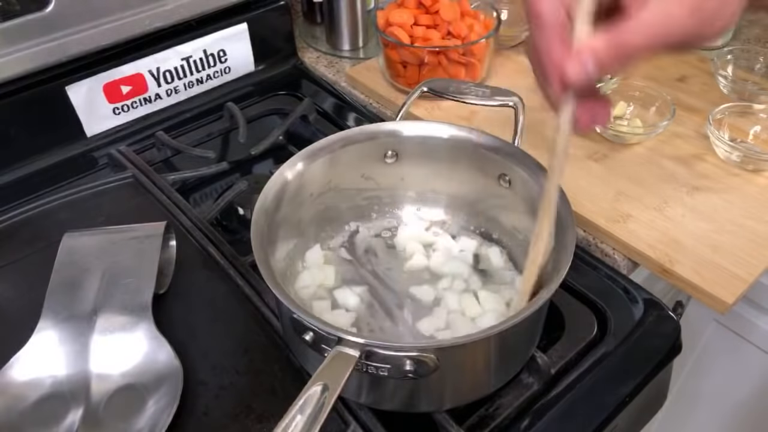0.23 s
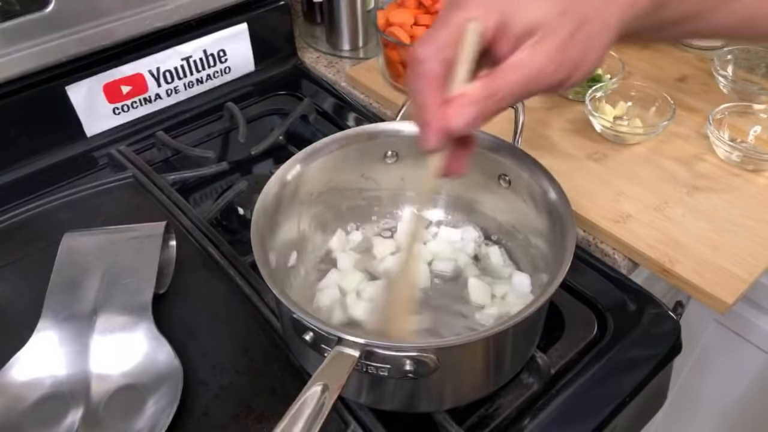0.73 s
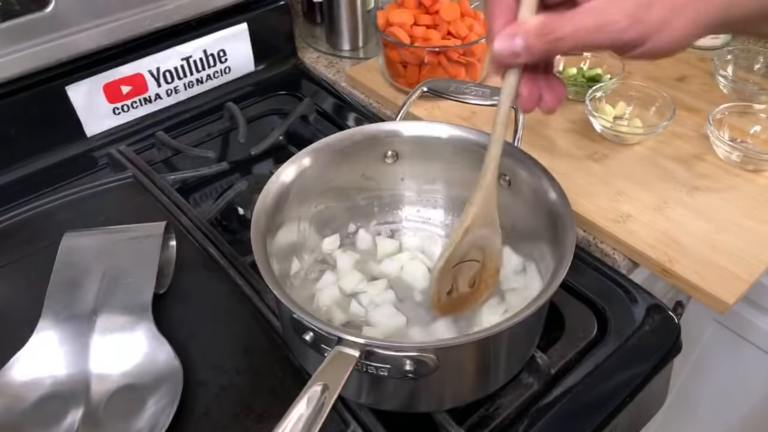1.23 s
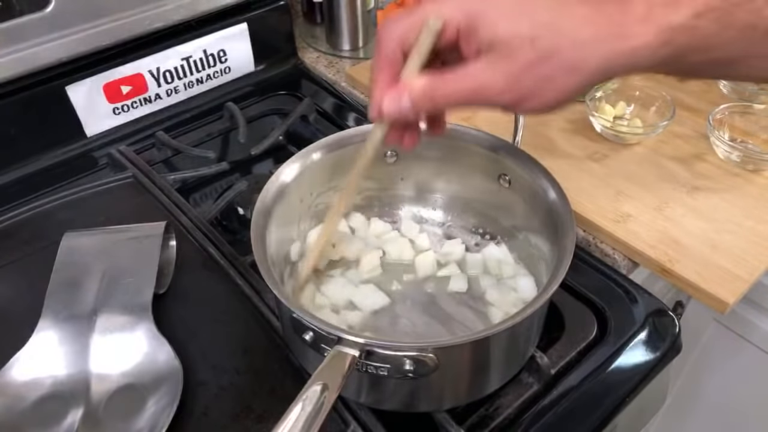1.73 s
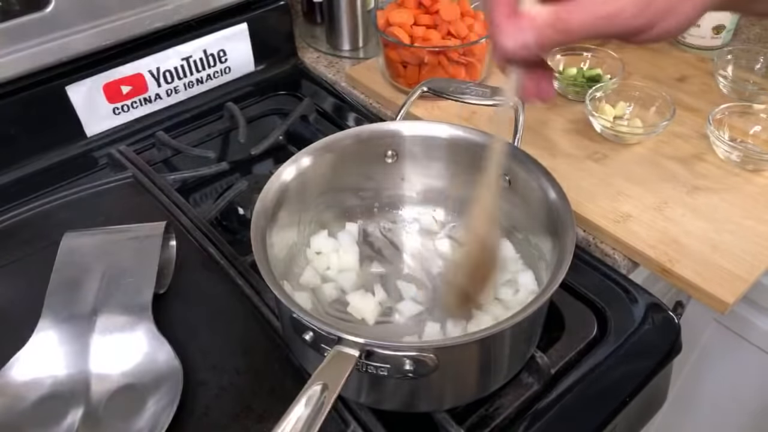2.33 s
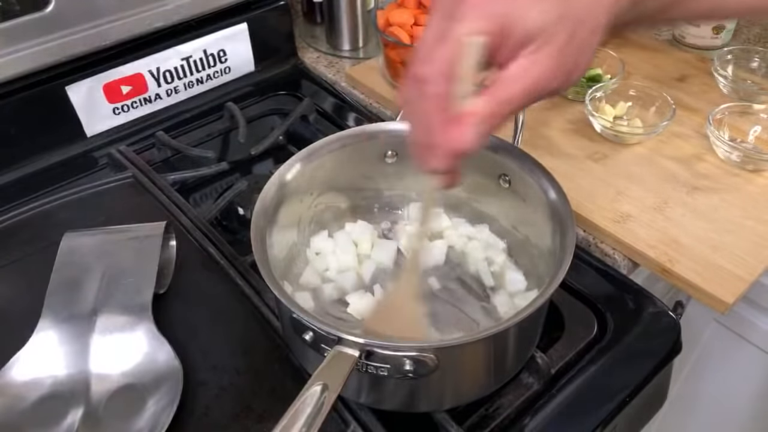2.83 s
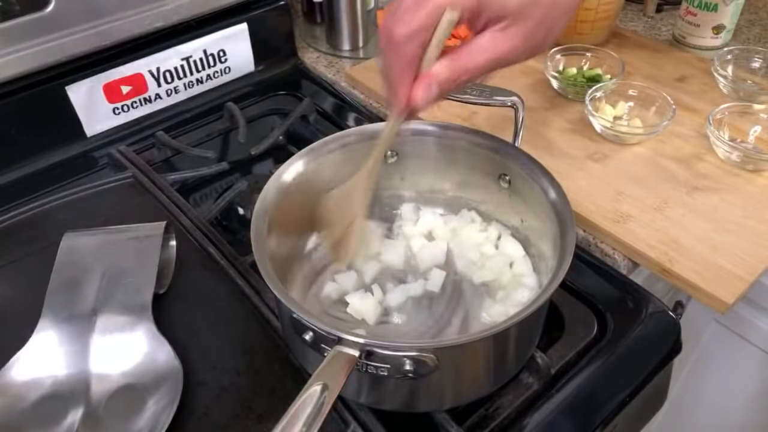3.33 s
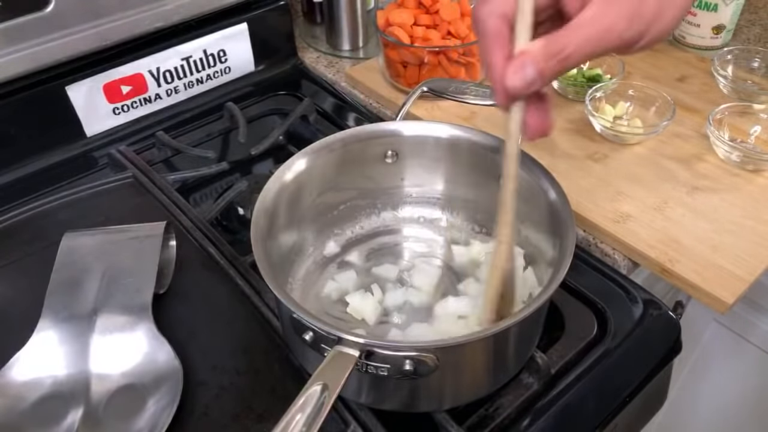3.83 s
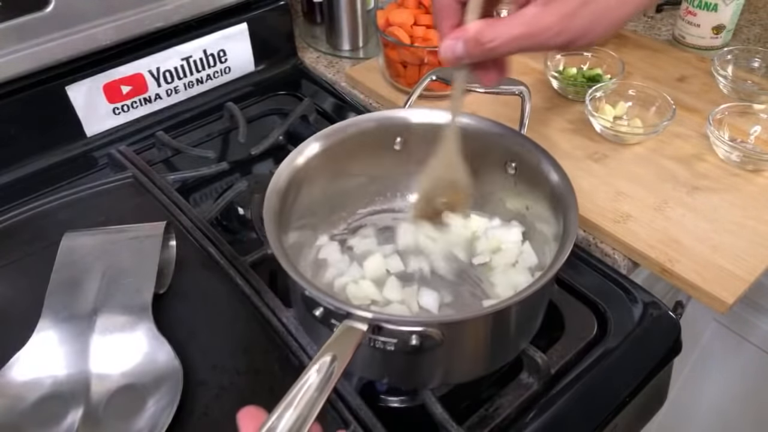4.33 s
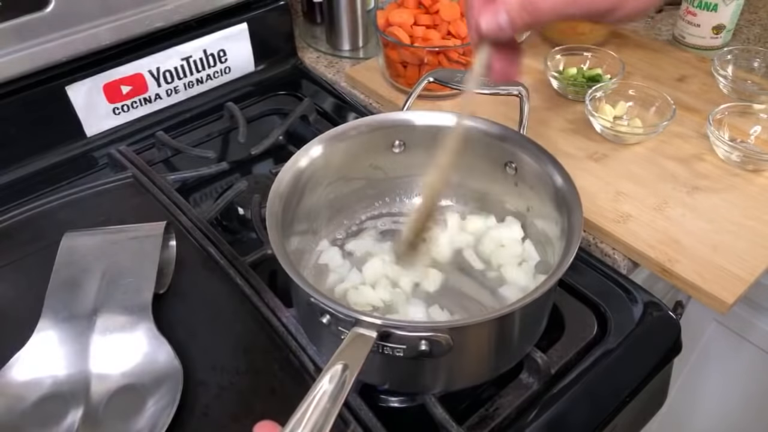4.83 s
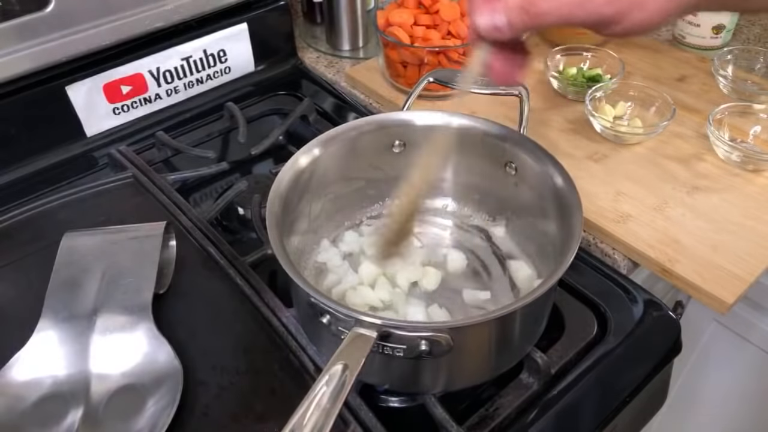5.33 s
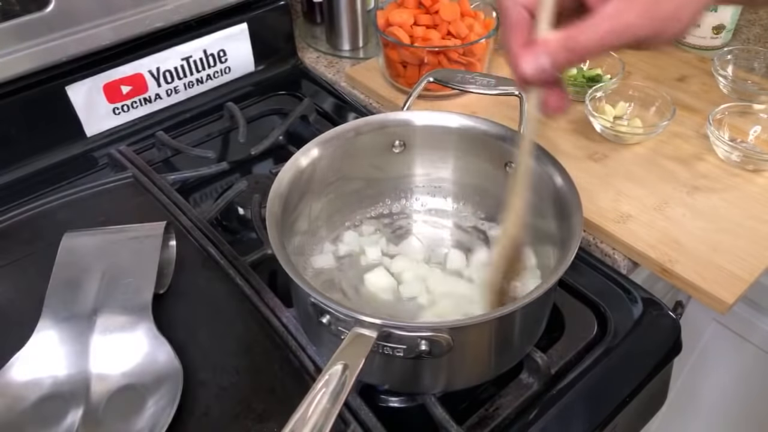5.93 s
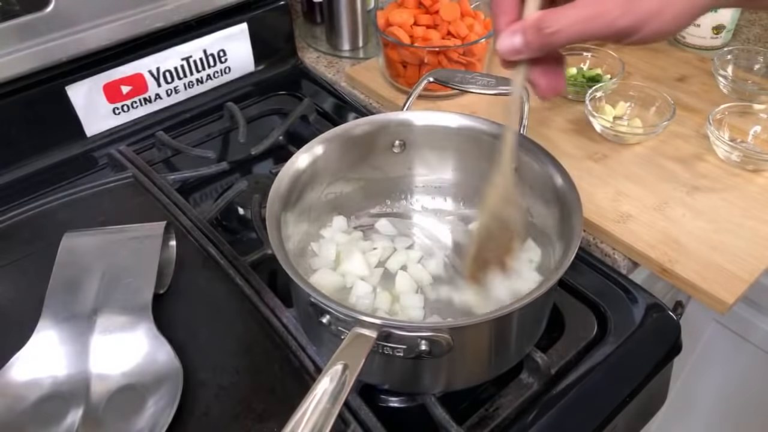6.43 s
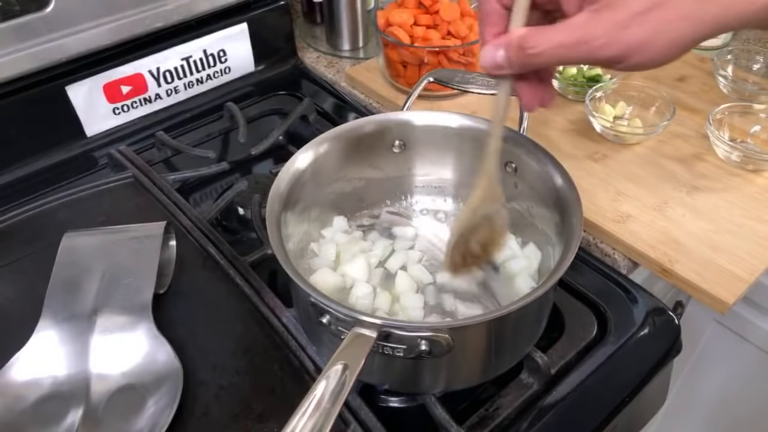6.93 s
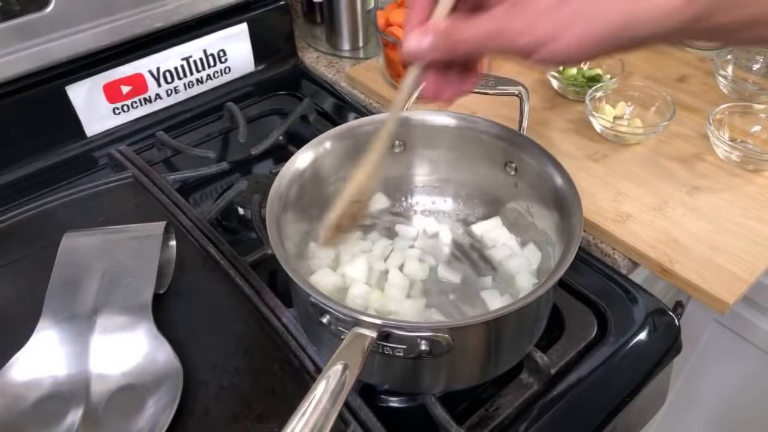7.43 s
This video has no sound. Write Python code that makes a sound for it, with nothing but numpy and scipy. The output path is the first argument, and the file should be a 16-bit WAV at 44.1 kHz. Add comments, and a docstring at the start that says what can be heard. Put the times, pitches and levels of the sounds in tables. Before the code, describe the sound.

Someone stirs chopped onion in a metal pan, woody taps and short drags ringing the steel above soft sizzling, the sound dropping out once late.

```python
"""In a hard-walled kitchen a wooden spoon stirs chopped onion in a steel saucepan on a gas stove.
Blows are filtered impulses with a stick-slip drag of noise; they excite the pan's damped modes, and the pan
also rocks on its grate. Shaped noise makes the sizzle, the rumble, the spitting oil and the kitchen hum.
Sparse decaying echoes form the room. The level dips briefly once, and later fades to silence and returns."""
import sys
import numpy as np
from scipy import signal
from scipy.io import wavfile
from scipy.ndimage import uniform_filter1d

SR = 44100
rng = np.random.default_rng(int(sys.argv[2]) if len(sys.argv) > 2 else 0)


def to_wav(sig):
    """Store sig (one row per channel, or 1-D mono) as 16-bit WAV at the path in sys.argv[1].

    Samples outside -1..1 are clipped; the rate is SR.
    """
    pcm = np.clip(np.atleast_2d(sig), -1, 1) * 32767
    pcm = np.round(pcm).astype(np.int16)
    wavfile.write(sys.argv[1], SR, pcm.T)  # frames by channels


N = 338688

# Spoon blows. Each row: start in seconds, level in dB, contact time in ms, tick in dB, thud in dB,
# ring in dB over the usual, 60 dB decay time of the drag in seconds, and spot (no unit, held within -1 to 2):
# -1, 0 and 1 are three places round the wall, 2 is the base.
BLOWS = [(0.001, -42, 0.76, -15, -8, 9.5, 0.038, -0.9), (0.214, -19, 0.087, -3, -10.5, 5, 0.14, -0.93),
         (0.342, -43, 0.58, -12.5, -3, 6.5, 0.96, 2.3), (0.583, -32, 0.23, -20, 3, -3.5, 0.11, -3),
         (0.981, -19, 0.11, 14, -4, 2, 0.24, -1.05), (1.016, -24.5, 0.33, -26, 1.5, -10, 0.16, 2),
         (1.37, -21, .15, -4.5, -13.5, 1, 0.17, 0.54), (1.503, -27.5, 0.17, 2.5, 9, 0.5, 0.17, 8),
         (1.516, -22, 0.63, -29, -11.5, -8.5, 0.19, -2.5), (1.769, -44.5, 0.82, -11, -8, -5.5, 0.07, 4),
         (2.054, -36, 0.21, -23, 4, -2, 0.21, -1), (2.108, -40, 0.56, -19, 0, -4.5, 0.19, 1.9),
         (2.397, -24.5, 0.14, -15, -6.5, 2, 0.17, 0.18), (2.654, -38, 0.16, -9, -26, -4.5, 0.06, 2.3),
         (2.723, -34.5, 0.29, -20, 4.5, -3.5, 0.26, 2.4), (2.956, -51, 0.96, -8, -5, 2.5, 0.055, 4),
         (3.207, -33, 0.34, -24, 0.5, -4, 0.26, 1.5), (3.857, -43, 0.72, -25, -11.5, -2, 0.38, 0.5),
         (3.922, -38.5, 0.78, -36, -5, -4.5, 0.16, 2.3), (4.128, -31.5, 0.31, -28, -8.5, 1.5, 0.23, 1),
         (4.164, -25, 0.48, -23.5, 1, -3.5, 0.6, 0.7), (4.628, -37, 0.28, -11.5, 4.5, 4, 0.39, -0.7),
         (4.959, -34.5, 0.36, -19, 2, 1, 0.52, -0.7), (5.001, -26, 0.47, -24, -5, -4.5, 0.15, 1.4),
         (5.741, -27, 0.82, -47, -22, -3.5, 0.07, 1.5), (5.949, -24, 0.2, -5.5, -14, 5, 0.25, 0.86),
         (6.053, -21.5, 0.38, -19.5, -6.5, -7, 0.15, 2.12),
         (6.322, -30.5, 0.32, -24, -8.5, -1.5, 0.17, 0.7), (6.414, -31.5, 0.62, -25, -5, -10.5, 0.14, 1),
         (6.845, -22, 0.23, -2.5, -6, -6, 0.11, -1.2), (6.87, -24, 0.43, -24, -10, 0, 0.13, 1.34),
         (7.272, -21.5, 0.37, -23, -4, -6, 0.051, 1.96), (7.541, -29, 0.54, -29, -10, -1.5, 0.18, 1.2)]
# Pan modes, the low ones damped by oil, onion and grate. Each row: frequency in Hz,
# level in dB when struck at spot -1, 0, 1 and 2, and 60 dB decay time in seconds.
PAN_MODES = [(170.7, -5.5, -6, -4.5, 4, 0.21), (351.6, 2.5, 2, 10, 4, 0.032),
             (649, -6.5, -10, -20.5, -8, 0.14), (804, -10, -16, -14, 1, 0.14),
             (856.5, -5, -4, -3, -3, 0.14), (916.4, -8.5, -10, -8, 3.5, 0.11),
             (1273, -4, -6, -26, -3.5, 0.061), (1506, -12, -20, -12, -1, 0.13),
             (1768, -22, -22, -26, 2, 0.14), (1930, -6, -12, -10, 2.5, 0.12), (2275, -3, -3, -14, 6, 0.08),
             (2489, -9, 3, -18, -24, .6), (2835, -16, -20, -3, -28, .36), (3289, -22, -30, -20, -30, 1.4),
             (3368, -10, -26, -22, -28, .3), (3471, -17, -14, -3, -28, .36), (3576, -14, -15, -6, -26, .7),
             (4123, -18, -13, -7, -30, .5), (4507, 0, -20, -16, -24, .33), (4948, -13, -22, -18, -24, .25),
             (5625, -19, -24, -20, -13, .24), (6186, -14, -22, -16, -20, .14),
             (6568, -11, -24, -22, -26, .28)]
RING_DB = -30  # base level of the pan modes, before the adjustments for each source


def gain_of(db):
    """Level definition: amplitude is ten to the power dB / 20."""
    return 10 ** (np.asarray(db) / 20)


def decay(t, t60):
    """Exponential damping: the level falls 60 dB in each t60 seconds."""
    return gain_of(-60 * t / t60)


def unit_rms(x):
    """Mean-square normalization: scales a signal to rms 1."""
    return x / np.sqrt(np.mean(x ** 2) + 1e-20)


def interpolate(points, hz):
    """Logarithmic pitch scale: reads a (Hz, value) table along log frequency."""
    f, value = np.transpose(points)
    return np.interp(np.log(hz + 1), np.log(f + 1), value)


def add(mix, start_s, sound):
    """Superposition: adds a sound to the mix at its starting time."""
    part = mix[round(start_s * SR):][:len(sound)]
    part += sound[:len(part)]


def minimum_phase(points, size=1024):
    """Minimum phase: a (Hz, dB) table fixes a causal filter through the Hilbert transform; energy is 1."""
    hz = abs(np.fft.fftfreq(size, 1 / SR))
    log_gain = np.log(gain_of(interpolate(points, hz)))
    spectrum = np.exp(np.conj(signal.hilbert(log_gain)))
    taps = np.fft.ifft(spectrum).real[:size // 2]
    return taps / np.linalg.norm(taps)


def patchy_noise(points, patchy_db, size):
    """Random noise with a shaped spectrum whose level wanders in time and frequency; rms 1."""
    hz = np.fft.rfftfreq(size, 1 / SR)
    real, imaginary, patches = rng.standard_normal((4 * N // size + 5, len(hz), 3)).T
    patches = uniform_filter1d(patches, size=9, axis=0)
    patches = unit_rms(uniform_filter1d(patches, size=9, axis=1))
    level_db = interpolate(points, hz)[:, None] + patchy_db * patches
    z = (real + 1j * imaginary) * gain_of(level_db)
    noise = signal.istft(z, nperseg=size, noverlap=3 * size // 4)[1]
    return unit_rms(noise[:N])


def stove():
    """Random sources add: sizzle of hiss and tiny crackles, low rumble, and the steady kitchen hum."""
    # Each row: time in seconds, sizzle level in dB, level in dB of the low rumble of hand, handle and grate.
    levels = [(0, -68.5, -70.5), (1.3, -68, -72.5), (1.6, -66, -55.5), (2.0, -67, -72.5), (3.2, -65, -72),
              (3.4, -61.5, -64), (3.8, -68.5, -69.5), (4.15, -68.5, -70), (4.32, -60, -58), (4.5, -67, -68),
              (5.1, -65.5, -73.5), (5.901, -69.5, -66), (6.5, -65.5, -66), (7.0, -63.5, -76),
              (7.68, -64.5, -64.5)]
    # Spectra of sizzle, rumble and hum. Each row: frequency in Hz, relative level in dB per Hz.
    sizzle_spectrum = [(2350, -34.5), (4000, -3), (5330, -4.5), (6990, -5.5), (8300, 3.5), (9470, 6),
                       (12800, -0.5), (15800, -8.5)]
    rumble_spectrum = [(22, -34), (36, -16.5), (46, 3.5), (92, -0.5), (165, -1), (210, -13), (320, -23.5)]
    hum_spectrum = [(88, -14), (150, -2.5), (363, -3.5), (565, -10), (644, -6.5), (879, -7.5),
                    (1460, -12.5), (1930, -11.5), (7500, -22.5), (9750, -32), (16500, -120)]
    time_s, sizzle_db, rumble_db = np.transpose(levels)
    t = np.arange(N) / SR
    sizes = gain_of(4.4 * np.minimum(rng.exponential(1, N), 5))
    happens = rng.random(N) < 1500 / SR  # on average 1500 crackles a second
    crackle = sizes * happens * rng.choice([-1, 1], N)
    crackle = unit_rms(signal.oaconvolve(crackle, minimum_phase(sizzle_spectrum))[:N])
    sizzle = unit_rms(patchy_noise(sizzle_spectrum, 1.8, size=256) + 0.25 * crackle)
    rumble = patchy_noise(rumble_spectrum, 5.1, size=2048)
    hum = gain_of(-69) * patchy_noise(hum_spectrum, 3.2, size=1024)
    sizzle = gain_of(np.interp(t, time_s, sizzle_db)) * sizzle
    rumble = gain_of(np.interp(t, time_s, rumble_db)) * rumble
    return sizzle + rumble + hum


def blow_colour(contact_ms, tick_db, thud_db):
    """Contact time sets bandwidth: short reaches high, long is dull; a tick lies on top, a thud below."""
    # Each entry: frequency in Hz of a band in the spectrum of a blow.
    band_hz = (280, 850, 2200, 4500, 8500)
    hz = np.array(band_hz)
    # the push fades at 26 dB per octave above 1 / contact time; the tick rises at 4.5 dB per octave
    octaves_above = np.log2(hz * max(contact_ms, .02) / 1000)
    push_power = 1 / (1 + gain_of(2 * 26 * octaves_above))
    tick_power = gain_of(2 * (tick_db + 4.5 * np.log2(hz / hz[-1])))
    db = 10 * np.log10(push_power + tick_power)
    db = db + thud_db * (hz == hz[0])
    return [(60, db[0] - 18), *zip(hz, db), (16000, db[-1] - 24)]


def pan_modes(length):
    """Modal vibration: gives each mode's gain at the four spots, and its damped sine."""
    hz, *spot_db, t60 = np.transpose(PAN_MODES)
    t = np.arange(length) / SR
    rings = np.sin(2 * np.pi * hz[:, None] * t) * decay(t, t60[:, None])
    return gain_of(spot_db), rings


def spoon():
    """Impulse and stick-slip friction: each blow and its dying drag is heard directly and excites the modes."""
    travel_s = 0.0022  # from the pan to the microphone
    bounce_s = .06  # a touch this soon after a blow leaves its ring undamped
    out, ringing = np.zeros(N), np.zeros(N)
    spot_gains, rings = pan_modes(SR)
    t = np.arange(SR // 2) / SR
    # countless small, quickly damped modes smear each blow into a clatter
    clatter = rng.standard_normal((len(BLOWS), SR // 20)) * decay(t[:SR // 20], 0.024)
    clatter /= np.linalg.norm(clatter, axis=1, keepdims=True)
    mode_luck_db = rng.standard_normal((len(BLOWS), len(PAN_MODES)))
    friction = rng.standard_normal((len(BLOWS), len(t), 2))
    landings = np.sort([row[0] for row in BLOWS] + [2 * N / SR])  # the last lies past the end
    for blow, luck_db, slips, smear in zip(BLOWS, mode_luck_db, friction, clatter):
        start_s, db, contact_ms, tick_db, thud_db, ring_db, drag_t60, spot = blow
        uneven = unit_rms(uniform_filter1d(slips[:, 1], size=90))  # stick and slip in 2 ms clumps
        drag = gain_of(-21.0 + 3.1 * uneven) * decay(t, max(drag_t60, .01)) * slips[:, 0]
        # the slips are too small and scattered to ring the pan as the blow does
        heard, driving = drag, gain_of(-20) * drag.copy()
        heard[0] += 1
        # the blow's impulse joins the weakened drag at its first sample, and both drive the pan together
        driving[0] += 1 + gain_of(-20) * 0
        taps = minimum_phase(blow_colour(contact_ms, tick_db, thud_db))
        heard, driving = gain_of(db) * signal.oaconvolve([heard, driving], taps[None], axes=1)
        # a blow between two spots mixes their mode gains
        weights = np.clip(1 - abs(np.clip(spot, -1, 2) - np.arange(-1, 3)), 0, 1)
        mode_gains = weights @ spot_gains * gain_of(luck_db + RING_DB + ring_db + 3.5)
        ring = signal.fftconvolve(driving, mode_gains @ rings)
        # the next touch of the spoon damps the ringing by 9 dB within 20 ms; a quick bounce does not
        next_touch_s = landings[landings > start_s + bounce_s][0] - start_s
        after = np.arange(len(ring)) / SR - next_touch_s
        ring = ring * gain_of(-9 * np.clip(50 * after, 0, 1))
        add(out, start_s + travel_s, gain_of(-10.5) * heard)
        add(out, start_s + travel_s, gain_of(3.5) * signal.oaconvolve(heard, smear))
        add(ringing, start_s + travel_s, ring)
    return out, ringing


def kitchen(x):
    """Reverberation: sparse echoes of random sign, each band dying at its own speed; two tails take turns."""
    # Absorption of the room. Each row: frequency in Hz, 60 dB decay time in seconds.
    band_t60 = [(150, 1), (700, 0.36), (2500, 0.49), (7000, 0.34), (14000, 0.22)]
    taps = np.zeros((2, SR))
    # one echo at a random place in every 20 samples
    at = np.arange(140, SR - 20, 20) + rng.integers(0, 20, (2, (SR - 141) // 20))
    np.put_along_axis(taps, at, rng.choice([-1., 1.], at.shape), 1)
    hz, t, z = signal.stft(taps, SR, nperseg=256)
    z = z * decay(t, interpolate(band_t60, hz)[:, None])
    tails = signal.istft(z, SR, nperseg=256)[1]
    turn = 2 * np.pi * 0.9 * np.arange(N) / SR  # 0.9 turns a second
    fed = x * np.array([np.cos(turn), np.sin(turn)])
    echoes = signal.fftconvolve(fed, tails / np.linalg.norm(tails[0]), axes=1)
    return echoes[:, :N].sum(0)


def rocking():
    """Repeated impact: a blow on the wall sets the pan tapping its grate, dull dying touches that ring the base."""
    interval_s, rock_db, rock_t60 = .036, -10.5, 0.41
    taps = np.zeros(N)
    luck = rng.standard_normal((len(BLOWS), 2, 8))  # eight touches a blow
    for (start_s, db, *_, spot), (late, loud) in zip(BLOWS, luck):
        after = interval_s * np.cumsum(np.clip(1 + .25 * late, .3, 2))
        on_wall = np.clip(2 - spot, 0, 1)  # a blow on the base rocks nothing
        sizes = on_wall * gain_of(db + rock_db + 4.0 * np.clip(loud, -2, 1)) * decay(after, rock_t60)
        for wait, size in zip(after, sizes):
            add(taps, start_s + wait, np.array([size]))
    spot_gains, rings = pan_modes(SR // 4)
    base = gain_of(RING_DB) * spot_gains[-1] @ rings
    touch = minimum_phase(blow_colour(contact_ms=0.89, tick_db=-41, thud_db=-17))
    return signal.fftconvolve(taps, signal.fftconvolve(touch, base))[:N]


def spits():
    """Sudden release of pressure: bursting steam pockets in the oil are short bright puffs of noise."""
    # Each row: start in seconds, level in dB, 60 dB decay time in seconds.
    bursts = [(2.6554, -45.5, 0.12), (2.665, -49, 0.0077), (3.1235, -50, 0.01), (3.321, -45, 0.0076),
              (3.4077, -44, 0.0036), (4.996, -48, 0.01), (5.061, -47, 0.01), (5.7242, -47, 0.01),
              (7.1805, -47, 0.0071), (7.498, -55.5, 0.17), (7.516, -47.5, 0.1)]
    peak_hz = 8860
    spectrum = [(peak_hz / 5, -26), (peak_hz / 1.5, -12), (peak_hz, 0), (peak_hz * 1.6, -14)]
    taps = minimum_phase(spectrum)
    t, out = np.arange(SR // 10) / SR, np.zeros(N)
    puffs = rng.standard_normal((len(bursts), len(t)))
    for (start_s, db, t60), puff in zip(bursts, puffs):
        puff = puff * decay(t, max(t60, .002))
        add(out, start_s, gain_of(db) * signal.oaconvolve(puff, taps))
    return out


def scene():
    """Superposition of direct sound and echoes: spoon, pan and spits in the room, over the stove."""
    knocks, ringing = spoon()
    ringing = ringing + rocking()
    sharp = knocks + spits()
    # the open pan aims its ringing up at the microphone, so less of it comes back from the walls
    echoes = gain_of(-5) * kitchen(sharp + gain_of(-6) * ringing)
    return (sharp + ringing + echoes + stove())[None]


def record(dry):
    """Gain and band limits: the sinking level, dip and fade, the microphone's bass cut, then a treble limit."""
    dip_s, dip_fall_s, dip_rise_s = .533, .025, .006  # lowest moment, way down, way up
    fade_s, fade_length_s, back_s = 5.428, .09, 5.606  # fade to silence, and the sudden return
    t = np.arange(N) / SR
    db = np.interp(t, [0, fade_s], [5.5, 1.5])  # sinks slowly until the fade, then stays
    db = db + np.interp(t, [dip_s - dip_fall_s, dip_s, dip_s + dip_rise_s], [0, -20, 0])
    fade = np.clip(1 - (t - fade_s) / fade_length_s, 0, 1) ** 2.6
    fade = np.where(t < back_s, fade, 1)
    heard = dry * gain_of(db) * fade
    bass_cut = signal.butter(4, 36, "high", fs=SR, output="sos")
    heard = signal.sosfilt(bass_cut, heard)
    treble_limit = signal.firwin(511, 15780, window=("kaiser", 9), fs=SR)
    return signal.oaconvolve(heard, treble_limit[None], "same")


dry = scene()
out = record(dry)
to_wav(out)
```